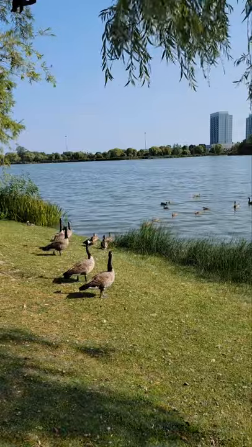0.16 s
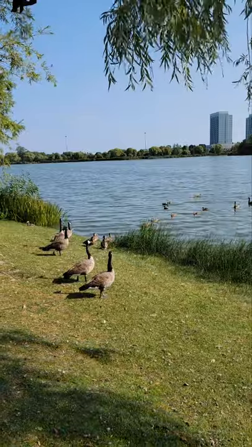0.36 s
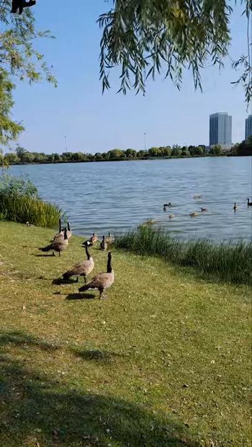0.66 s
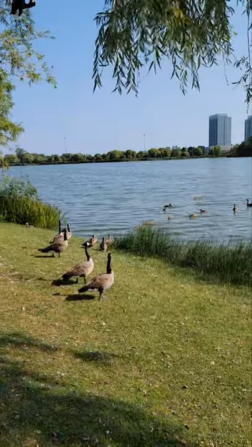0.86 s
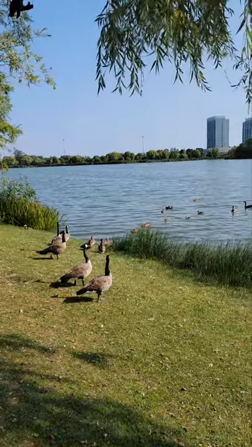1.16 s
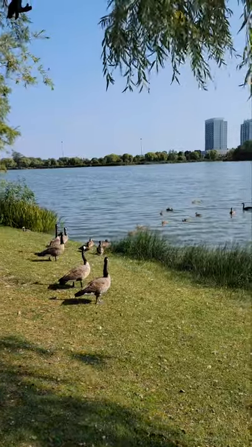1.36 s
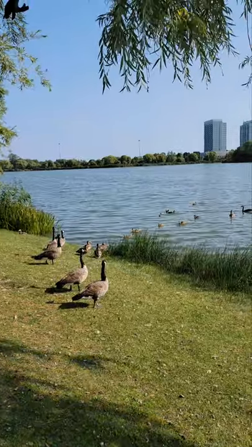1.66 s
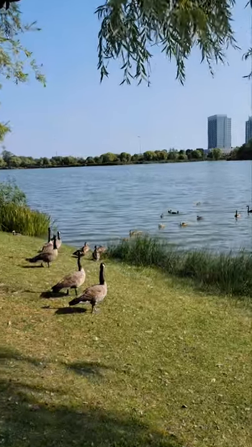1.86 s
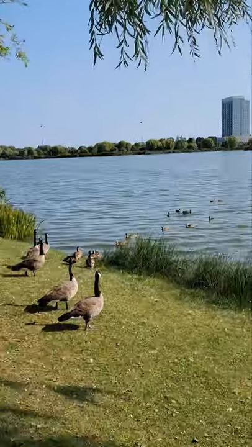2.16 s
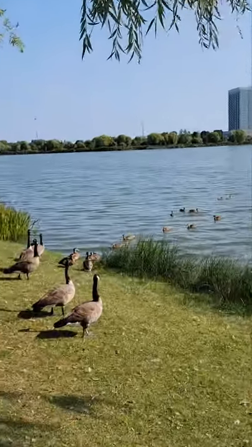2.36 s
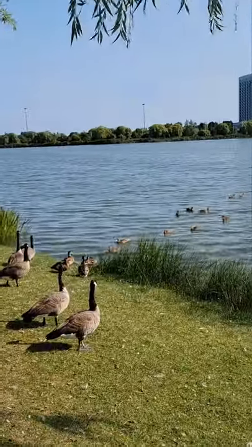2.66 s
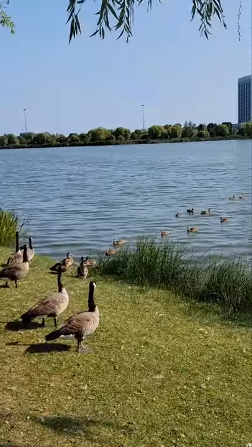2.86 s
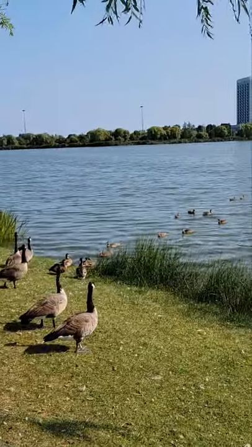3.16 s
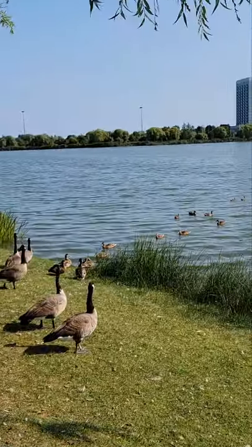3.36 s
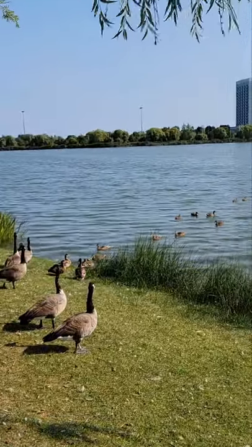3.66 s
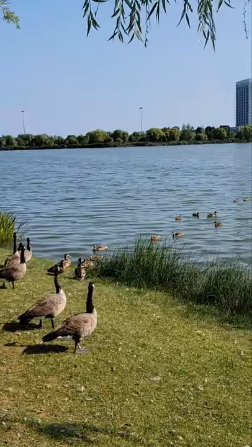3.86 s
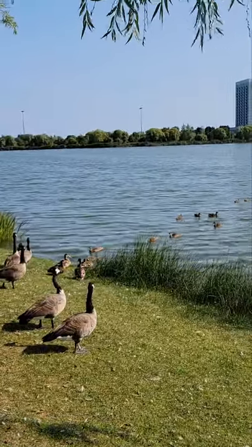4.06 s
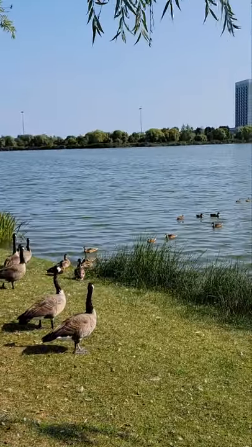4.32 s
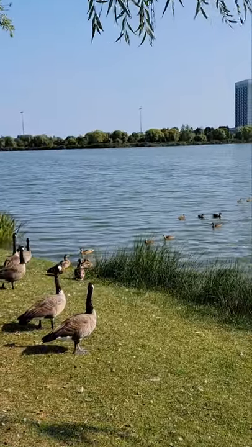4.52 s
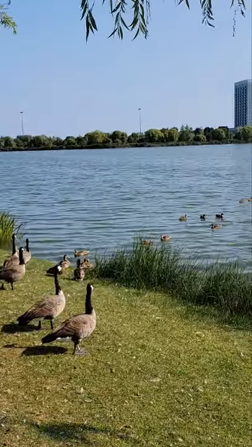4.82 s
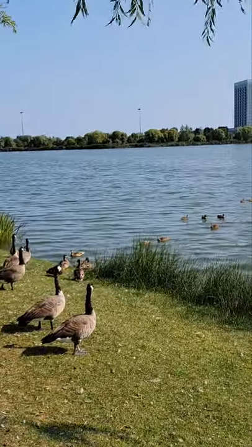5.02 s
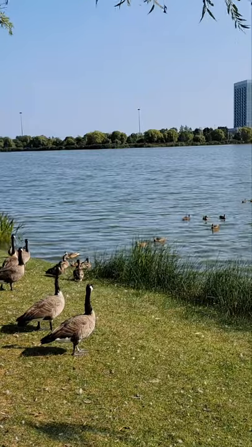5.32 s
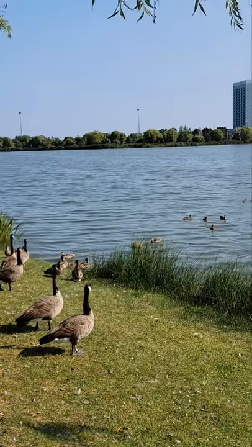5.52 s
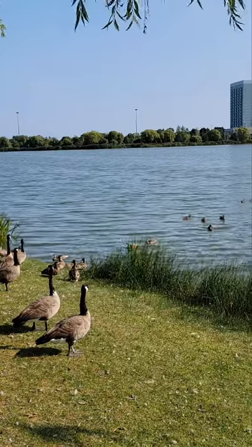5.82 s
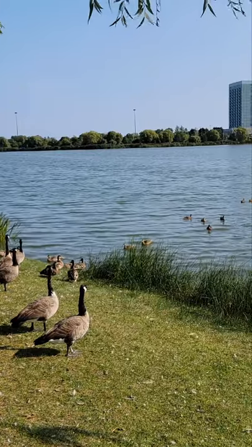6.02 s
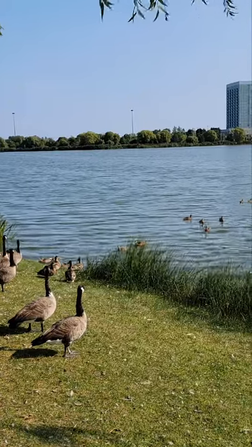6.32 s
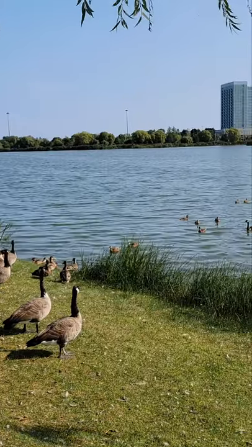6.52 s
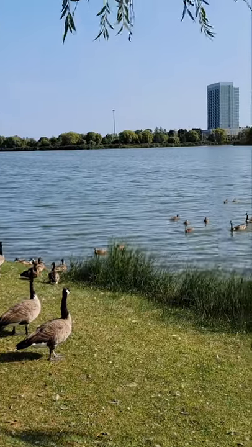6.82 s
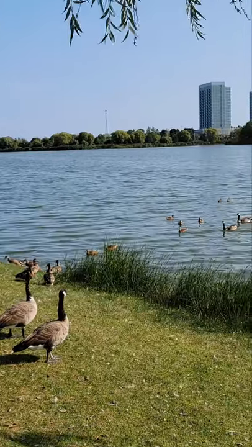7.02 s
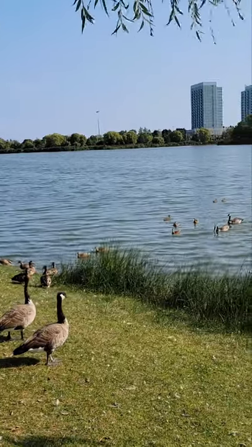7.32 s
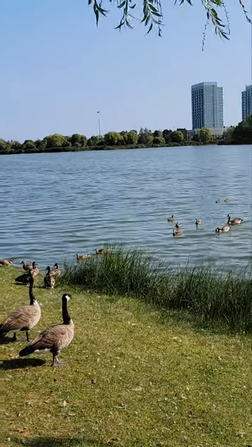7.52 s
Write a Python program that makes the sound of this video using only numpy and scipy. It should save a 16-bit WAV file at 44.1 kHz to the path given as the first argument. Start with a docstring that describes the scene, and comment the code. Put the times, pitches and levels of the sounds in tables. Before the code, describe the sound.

Outdoors on a grassy lake bank, heard through a handheld stereo phone. Steady low wind rumble flutters and gusts, over a soft distant town wash and a thin, high, dry cicada buzz; one nearer buzzer fades after 3 s while another grows further off. A faint far bird call opens the scene. A nearby goose creaks in quickening slow pulses, breaking into a brief nasal honk at 0.95 s; another comes at 1.7 s. A short low grunt follows at 2.3 s. At 3.1 s a honk is chased at once by a lower, hoarser one at 3.23 s, then a gruff grunt at 3.45 s with faint distant bird calls. Afterwards the geese are quiet. Wind thumps at 3.5, 3.8, 4.55 and strongly at 6.4 s, mostly left. Tiny distant calls come at 5.6 and 6.7 s; grass crackles barely audibly around 6.1-6.4 s. Gusts continue until 7.7 s.

```python
"""Geese on the grassy bank of a lake give short honks and two low grunts: harmonic stacks and pulsed resonances.
Creaks of slow pulses lead most honks into a clear tone. Other water birds call far out in swelling sines.
Cicadas buzz in the trees as clicks through random paths, over a noise chorus; grass crackles underfoot.
A town hums across the water as shaped noise; wind noise rumbles on the two ports of a hand-held phone."""
import sys
import numpy as np
from scipy import signal
from scipy.fft import rfft, irfft, next_fast_len
from scipy.io import wavfile
from scipy.ndimage import map_coordinates

SR = 44100
rng = np.random.default_rng(int(sys.argv[2]) if len(sys.argv) > 2 else 0)


def generate_wav(signal):
    """Clip the signal to [-1, 1] and save it as 16-bit WAV at the path in sys.argv[1]."""
    frames = np.transpose(np.atleast_2d(signal))
    scaled = np.clip(frames, -1, 1) * 32767
    pcm = np.round(scaled).astype(np.int16)
    wavfile.write(sys.argv[1], SR, pcm)


N = 338667
T = np.arange(N) / SR

# Levels are relative: source gains, spectra and panning act on top of them.
# honks, one list each: (time [s], fundamental [Hz], level of harmonic 2 [dB])
HONK_TRACKS = [
    [(.939, 654, -38), (.95, 672, -25), (.962, 690, -22), (1.0, 689.7, -22), (1.02, 688, -24.5),
     (1.031, 663, -25), (1.041, 637, -29), (1.057, 595, -43)],
    [(1.722, 650, -29), (1.73, 657, -19), (1.74, 685, -17), (1.752, 706, -22), (1.768, 706, -25.5),
     (1.79, 698, -30), (1.802, 662, -29), (1.811, 616, -35), (1.825, 582, -47)],
    [(2.321, 487, -51), (2.331, 505, -40), (2.348, 516, -53)],
    [(3.121, 640, -40), (3.129, 674, -29), (3.14, 693, -24), (3.153, 699, -23), (3.168, 697, -25),
     (3.19, 672, -29), (3.206, 644, -43)],
    [(3.233, 535, -41), (3.243, 510, -28), (3.257, 512, -29), (3.275, 525, -30), (3.297, 540, -38),
     (3.307, 524, -39), (3.319, 510, -45)],
]
# voice of each honk: (flutter decay [s], overtone hoarseness [rad], levels of harmonics 1-8 [dB])
HONK_VOICES = [(0.016, 0.22, [-31, 0, -49, -42, -47, -31, -44, -42]),
               (0.0042, .2, [-32, 0, -42, -33, -35.5, -32, -40, -41]),
               (.004, .4, [3, 0, 3, -18, -23, -22, -22, -16]),
               (0.022, 0.65, [-25, 0, -36, -35, -43, -34, -47, -50]),
               (0.0051, 0.58, [-23.5, 0, -19, -30.5, -41, -34, -44, -34])]
# creaks, most leading into a call: (time of surge peak [s], build-up [s], level [dB])
CREAK_EVENTS = [(.943, .18, -30.5), (1.721, .14, -33), (3.124, .1, -31.5), (3.232, .045, -33.5),
                (3.449, 0.011, -36.5), (3.506, .012, -48)]
# resonances of the creak: (centre [Hz], width [Hz], level [dB])
CREAK_RESONANCES = [(610, 170, -16), (1028, 62, 0), (1216, 66, 5.5), (1350, 52, 6), (2700, 1100, -27),
                    (3940, 710, -36)]
# grunts: (start [s], length [s], top pulse rate [Hz], level [dB], effort peak [share of length], droop [share])
GRUNT_EVENTS = [(2.321, 0.09, 174.7, -33.5, 0.39, 0.125), (3.436, 0.077, 157.5, -33.5, .3, 0.114)]
# resonances of each grunt, bill nearly shut: (centre [Hz], width [Hz], level [dB])
GRUNT_RESONANCES = [
    [(700, 95, -1.5), (1236, 80, 6.5), (1510, 90, -19), (1920, 120, -14), (3830, 1000, -20),
     (5200, 260, -12)],
    [(470, 45, -7), (600, 66, -2), (1097, 42, 0), (1235, 40, 6), (1730, 45, -12), (3670, 150, -17.5),
     (4130, 230, -16.5)],
]
# calls of other water birds further out: (middle [s], length [s], pitch [Hz], level [dB], pitch spread [share])
FAR_CALL_EVENTS = [(0.021, 0.14, 1540, -50, 0.085), (3.54, 0.083, 2550, -63, 0.044),
                   (3.558, 0.058, 2010, -56.5, 0.01), (5.647, 0.21, 1267, -55.5, 0.0937),
                   (6.725, 0.17, 1780, -60, 0.0115)]
# one cicada in the willow overhead: (time [s], click rate [Hz], level [dB])
NEAR_CICADA_TRACK = [(0, 208, -41), (1, 206.5, -40), (1.6, 206, -42), (2.25, 206.1, -42), (2.6, 204, -44),
                     (3, 202.2, -46.5), (3.6, 209.6, -60), (4.5, 199, -62)]
# its spectrum: (frequency [Hz], level [dB])
NEAR_CICADA_SPECTRUM = [(3800, -57), (4600, -24), (5200, -22), (5700, -6.5), (6600, -5.5), (7900, -3),
                        (9000, -9.5), (9900, -9.5), (11000, -21), (12400, -13), (14000, -22.5),
                        (16000, -23)]
# another cicada further along the bank: (time [s], click rate [Hz], level [dB])
FAR_CICADA_TRACK = [(2.6, 202.3, -51), (3.5, 200.2, -49.5), (4.3, 202, -48.5), (4.8, 204.9, -45.5),
                    (5.8, 205, -46.5), (6.5, 204.4, -46.5), (7.2, 204.2, -46.5), (7.68, 201.5, -46)]
# its spectrum: (frequency [Hz], level [dB])
FAR_CICADA_SPECTRUM = [(4000, -63), (5100, -15), (5330, -6.5), (5800, -12.5), (6800, -7), (7600, -1),
                       (8300, -10.5), (9400, -9), (10300, -24), (11200, -35), (12300, -22.5), (14000, -39),
                       (16000, -30)]
# blurred chorus of the other cicadas: (time [s], level [dB])
CHORUS_TRACK = [(0, -50), (2, -48.5), (2.8, -46), (4, -45.5), (5, -47.5), (7.68, -51.5)]
# its spectrum: (frequency [Hz], level [dB])
CHORUS_SPECTRUM = [(4000, -21), (4800, -18), (5500, -6.5), (6500, -1.5), (7400, -2.5), (8500, -7),
                   (10000, -21.5), (11200, -20), (12400, -24), (14000, -22), (16000, -27)]
# steps in the grass: (middle [s], length [s], level [dB])
STEP_EVENTS = [(6.14, 0.49, -61.5), (6.37, 0.079, -58.5)]
# town and lapping water: (time [s], level [dB])
TOWN_TRACK = [(0, -44), (.5, -45.5), (1.2, -45.5), (2.6, -48), (3.4, -46), (4.5, -48), (5.3, -47),
              (6.2, -46), (7, -46.5), (7.68, -47)]
# their spectrum: (frequency [Hz], level [dB])
TOWN_SPECTRUM = [(30, -22), (70, -5.5), (150, -0.5), (250, -0.5), (400, -8.5), (600, -14.5), (950, -11),
                 (1400, -15.5), (2000, -25.5), (3000, -29.5), (4500, -36.5), (16000, -31.5)]
# breeze on the ports: (time [s], level [dB], left minus right [dB])
BREEZE_TRACK = [(0, -39.5, -2), (.5, -38, -1), (.65, -42, 0), (1.1, -39, -2.5), (1.65, -36.5, 1.5),
                (1.9, -41, -2), (2.6, -43.5, -1), (2.9, -37, 1), (3.2, -40.5, -4), (3.32, -32, -12),
                (3.78, -32, -7), (3.92, -37.5, -4), (4.25, -41.5, -1), (4.5, -36.5, -3.5),
                (5.3, -39.5, -1.5), (5.9, -39.5, -0.5), (6.8, -36, 2.5), (7.68, -43, 0)]
# short gusts on top of it: (middle [s], length [s], level [dB], left minus right [dB])
GUST_EVENTS = [(0.119, 0.046, -30.5, 16), (0.225, 0.098, -37, 3), (1.098, 0.14, -35.5, -15),
               (1.583, 0.25, -36.5, -2), (4.002, 0.082, -32.5, 14), (4.113, .1, -32, -7),
               (4.87, 0.12, -35, -12), (5.602, 0.16, -35.5, -5), (6.088, 0.07, -36, 11),
               (7.177, 0.23, -32, 6), (7.379, 0.068, -33.5, 6)]
# spectrum of breeze and gusts: (frequency [Hz], level [dB])
WIND_SPECTRUM = [(15, -50), (28, -20), (42, -3), (62, -0.5), (88, -3.5), (115, -11), (160, -24),
                 (300, -39.5), (800, -69)]
# single eddies that thump a port: (time [s], peak [dB], ring [Hz], left minus right [dB])
BUFFET_EVENTS = [(3.462, -23, 70, -17), (3.81, -16.5, 68.6, -10), (4.551, -20, 81, -16),
                 (6.424, -15, 80.4, 20)]

BREAK_S, BREAK_HOARSE_RAD = 0.0066, 0.62  # extra overtone hoarseness, decaying after the break into tone
EDGE_S, OVERTONE_RELEASE_S = 0.0056, 0.04
OVERTONE_SHARE = 0.4  # overtones follow this share of the level swings in dB
CREAK_SWELL_DB_PER_S, CREAK_SURGE_DB, CREAK_SURGE_S, CREAK_END_S = 72, 11, 0.035, 0.025
CREAK_SLOW_HZ, CREAK_FAST_HZ, CREAK_QUICKEN_S = 139.9, 177.4, .045
GRUNT_SCOOP = .06  # a grunt's pulse rate starts lower by this share
TOP_HZ = 15750


def geese(gain_db=2.5, shade=0.69, shade_hz=1300, facing=0.65, facing_hz=4000, scatter_db=-29):
    """Sum of creaks, honks and grunts, shaded by the phone and scattered by the bank."""
    creaks = sum(creak(*row) for row in CREAK_EVENTS)
    honks = sum(honk(rows, *voice) for rows, voice in zip(HONK_TRACKS, HONK_VOICES))
    grunts = sum(grunt(*row, modes) for row, modes in zip(GRUNT_EVENTS, GRUNT_RESONANCES))
    voice = undb(gain_db) * (creaks + honks + grunts)
    # the phone's body shades the left port in one band; the treble favours it, as it faces the geese
    treble = facing / 2 * signal.lfilter(*signal.iirpeak(facing_hz, 1, SR), voice)
    shaded = shade * signal.lfilter(*signal.iirpeak(shade_hz, 1.3, SR), voice)
    ports = np.array([voice - shaded + treble, voice - treble])
    return ports + bank_scatter(voice, scatter_db, t60_s=0.47)


def honk(rows, flutter_s, hoarse_rad, harmonics_db, waver=.002, patchy_db=3, flutter_hz=180, flutter_db=-3):
    """The syrinx sings a harmonic stack on a moving pitch; the throat mostly favours harmonic 2."""
    start_s, length_s = rows[0][0], max(rows[-1][0] - rows[0][0], .01)
    i, age = stretch(start_s, length_s)
    hz, db = curves(rows, start_s + age)
    phase = 2 * np.pi * np.cumsum(hz * (1 + waver * walk(430, len(i)))) / SR
    # the creak's slow flapping lingers: side tones under the main one
    flutter = undb(flutter_db) * np.exp(-(age / flutter_s) ** 2 - 2j * np.pi * flutter_hz * age)
    tone = undb(db) * np.imag(np.exp(2j * phase) * (1 + flutter + flutter ** 2))

    overtone_db = db.max() + OVERTONE_SHARE * (db - db.max())
    overtone_gain = undb(overtone_db) * ramp((length_s - age) / OVERTONE_RELEASE_S) ** 4
    spread_rad = hoarse_rad + BREAK_HOARSE_RAD * np.exp(-age / BREAK_S)
    for k, level_db in enumerate(harmonics_db, 1):
        if k != 2:
            blur = spread_rad * min(k / 4, 1) * walk(350, len(i))
            gain = overtone_gain * undb(level_db + patchy_db * walk(78, len(i)))
            tone += gain * np.sin(k * phase + blur)
    out = np.zeros(N)
    out[i] = np.sqrt(2) * tone * ramp(age / EDGE_S) * ramp((length_s - age) / EDGE_S)
    return out


def creak(peak_s, length_s, db, fade_in_s=0.0093):
    """Pressure builds: pulses grow louder and faster up to the surge peak, then die quickly."""
    i, age = stretch(peak_s - length_s, length_s + CREAK_END_S)
    lead = np.maximum(length_s - age, 0)
    hz = CREAK_SLOW_HZ + (CREAK_FAST_HZ - CREAK_SLOW_HZ) * np.exp(-lead / CREAK_QUICKEN_S)
    surge_db = CREAK_SURGE_DB * (np.exp(-lead / CREAK_SURGE_S) - 1)
    effort = undb(surge_db - CREAK_SWELL_DB_PER_S * lead)
    effort *= ramp(age / fade_in_s) * ramp((age[-1] - age) / CREAK_END_S) ** 2
    out = np.zeros(N)
    out[i] = undb(db) * rattle(hz, effort, CREAK_RESONANCES, jitter=.01, scatter_db=1.8, air_db=-9)
    return out


def grunt(start_s, length_s, rate_hz, db, peak, droop, modes, fullness=0.84, throat_share=0.78):
    """One arch of effort without clear tone; pulse rate and, less so, throat resonances rise and sag."""
    i, age = stretch(start_s, length_s)
    u = age / length_s
    scoop = GRUNT_SCOOP * (1 - u / peak) ** 2
    sag = droop * ((u - peak) / (1 - peak)) ** 2
    bend = 1 - np.where(u < peak, scoop, sag)
    throat = bend ** throat_share
    effort = np.sin(np.pi * np.interp(u, [0, peak, 1], [0, .5, 1])) ** fullness
    voice = rattle(rate_hz * bend / throat, effort, modes, jitter=.01, scatter_db=2, air_db=-11)
    out = np.zeros(N)
    out[i] = undb(db) * map_coordinates(voice, [np.cumsum(throat)])  # read speed shifts the resonances
    return out


def rattle(hz, effort, modes, jitter, scatter_db, air_db, brightening=0.3):
    """Slack membranes slap in slow pulses that ring the low resonances; rushing air stirs the high ones."""
    n = len(hz)
    hz = hz * (1 + .012 * walk(90, n))
    slaps = unit(pulses(hz, jitter, scatter_db))
    air = rng.standard_normal(n)
    voice = ring(unit(slaps + undb(air_db) * air), modes)
    rush = ring(unit(slaps + air), modes)
    low = signal.sosfiltfilt(signal.butter(4, 2200, fs=SR, output="sos"), voice)
    high = signal.sosfiltfilt(signal.butter(4, 2200, "high", fs=SR, output="sos"), rush)
    # the rush gains on the slaps as effort rises
    return (low + high * effort ** brightening) * effort / np.std(voice)


def bank_scatter(x, echo_db, t60_s=0.72):
    """Dull scatter from trees and reeds: convolution with decaying noise."""
    t = T[:SR]
    tail = rng.standard_normal((2, SR)) * undb(-60 * t / t60_s) * np.minimum(t / 0.029, 1)
    tail = signal.lfilter(*signal.butter(1, 3500, fs=SR), tail)
    tail /= np.sqrt(np.sum(tail ** 2, axis=1, keepdims=True))
    return undb(echo_db) * signal.fftconvolve(x[None], tail, axes=1)[:, :N]


def cicadas():
    """Two single buzzers in front of a noise chorus."""
    near = cicada(NEAR_CICADA_TRACK, NEAR_CICADA_SPECTRUM, waver=0.00166, likeness=0.054)
    far = cicada(FAR_CICADA_TRACK, FAR_CICADA_SPECTRUM, waver=0.001716, likeness=0.006)
    chorus_gain = undb(curves(CHORUS_TRACK)[0] + 1.84 * walk(6.6))
    chorus = colour(stereo_noise(likeness=-0.15), CHORUS_SPECTRUM) * chorus_gain
    return near * pan(2.5) + far * pan(3.0) + chorus * pan(0.5)


def cicada(rows, spectrum, waver, likeness, path_count=4):
    """Tymbal clicks ring the body; paths through swaying leaves make each harmonic fade on its own."""
    hz, db = curves(rows)
    clicks = pulses(hz * (1 + waver * walk(60)), jitter=.001, scatter_db=.8)
    shares = np.array([walk(0.815) for _ in range(path_count)])
    shares /= np.sqrt(np.sum(shares ** 2, axis=0))
    buzz = 0
    for share in shares:
        leaves = stereo_noise(likeness, SR // 35)
        buzz = buzz + share * signal.oaconvolve(clicks[None], leaves, axes=1)[:, :N]
    return colour(buzz, spectrum) * undb(db)


def far_birds():
    """Short swelling sines, some pure and some hoarse by pitch wander, blurred by the distance."""
    out = np.zeros(N)
    for middle_s, length_s, hz, db, hoarse in FAR_CALL_EVENTS:
        pitch_hz = hz * (1 + hoarse * walk(600))
        tone = np.sin(2 * np.pi * np.cumsum(pitch_hz) / SR)
        out += undb(db) * np.sqrt(2) * swell(middle_s, length_s) * tone
    return out + bank_scatter(out, echo_db=-9.5)


def wind(gain_db=2.5, flutter_db=1.0, port_flutter_db=0.6, eddy_s=0.0067):
    """Turbulence rumbles on each port, fluttering and gusting; single eddies thump as decaying rings."""
    db, pan_db = curves(BREEZE_TRACK)
    flutter = flutter_db * walk(9) + port_flutter_db * np.array([walk(10) for _ in range(2)])
    power = (undb(db + flutter) * pan(pan_db)) ** 2
    for middle_s, length_s, gust_db, side_db in GUST_EVENTS:
        power = power + (undb(gust_db) * swell(middle_s, length_s) * pan(side_db)) ** 2
    turbulence = colour(stereo_noise(likeness=.5), WIND_SPECTRUM)
    out = turbulence * np.sqrt(power) * undb(gain_db)
    for peak_s, peak_db, hz, side_db in BUFFET_EVENTS:
        t = T - peak_s
        thump = np.exp(-np.abs(t) / eddy_s) * np.cos(2 * np.pi * hz * t)
        out -= undb(peak_db) * thump * pan(side_db)
    return out


def steps():
    """Grass blades crackle faintly under a shoe: noise with a fast random level."""
    press = sum(undb(db) * swell(middle_s, length_s) for middle_s, length_s, db in STEP_EVENTS)
    blades = stereo_noise(likeness=.3) * undb(2.5 * walk(250))
    return press * colour(blades, [(500, -34), (1500, 0), (3000, 6), (5000, 0), (15000, -33)])


def town(swell_db=0.18):
    """A far-off wash of noise, most alike at the two ports in the bass."""
    wash = stereo_noise(likeness=0.38)
    mid = wash.mean(axis=0)
    wash = mid + signal.lfilter(*signal.butter(1, 350, "high", fs=SR), wash - mid)
    gain = undb(curves(TOWN_TRACK)[0] + swell_db * walk(3.6))
    return colour(wash, TOWN_SPECTRUM) * gain * pan(-2.0)


def undb(db):
    """Decibels to gain."""
    return 10 ** (np.asarray(db) / 20)


def unit(x):
    """Scale to rms 1."""
    return x / np.sqrt(np.mean(x ** 2))


def curves(rows, t=T):
    """Columns of a (time [s], values..) table, joined by straight lines."""
    s, *columns = np.transpose(rows)
    return [np.interp(t, s, c) for c in columns]


def response(points, hz):
    """Gain of a (frequency [Hz], level [dB]) spectrum at the given frequencies."""
    f, db = np.transpose(points)
    return undb(np.interp(np.log(hz + 1), np.log(f), db))


def colour(x, points):
    """Filter by a spectrum; rms 1."""
    size = next_fast_len(N)
    hz = np.arange(size // 2 + 1) * SR / size
    return unit(irfft(rfft(x, size) * response(points, hz), size)[..., :N])


def walk(rate_hz, n=N):
    """Random wander, straight lines between normal draws; spread near 1."""
    u = np.arange(n) * rate_hz / SR
    knots = int(u[-1]) + 2
    return 1.217 * np.interp(u, np.arange(knots), rng.standard_normal(knots))


def pan(db):
    """Left and right gains for a level difference, mean power 1."""
    g = undb(np.array([[1], [-1]]) * db / 2)
    return g / np.sqrt(np.mean(g ** 2, axis=0))


def stereo_noise(likeness, n=N):
    """Two noises with the given correlation."""
    mid, side = rng.standard_normal((2, n))
    return np.sqrt(1 + likeness) * mid + np.sqrt(1 - likeness) * side * np.array([[1], [-1]])


def pulses(hz, jitter, scatter_db):
    """A band-limited click once a cycle, each a little off in time (share of a cycle) and size."""
    phase = np.cumsum(hz) / SR
    at = np.interp(np.arange(.5, phase[-1]), phase, np.arange(len(hz)))
    late, size = rng.standard_normal((len(at), 2)).T
    at = at + jitter * late * SR / np.mean(hz)
    taps = at.astype(int)[:, None] + np.arange(-7, 9)
    d = taps - at[:, None]
    clicks = np.sinc(d) * np.sinc(d / 8) * undb(scatter_db * size)[:, None]  # windowed sinc
    return np.bincount(np.clip(taps, 0, len(hz) - 1).ravel(), clicks.ravel(), len(hz))


def ring(x, modes):
    """Parallel two-pole resonances, each steepened by a second one four times as wide."""
    out = 0
    for hz, width_hz, db in modes:
        peak = signal.iirpeak(hz, hz / width_hz, SR)
        skirt = signal.iirpeak(hz, hz / (4 * width_hz), SR)
        out = out + undb(db) * signal.lfilter(*skirt, signal.lfilter(*peak, x))
    return out


def stretch(start_s, length_s):
    """Sample indices of a call, and the seconds since its start."""
    age = np.arange(int(length_s * SR)) / SR
    return int(start_s * SR) + np.arange(len(age)), age


def ramp(x):
    """Quarter-sine step from 0 to 1."""
    return np.sin(np.pi / 2 * np.clip(x, 0, 1))


def swell(middle_s, length_s):
    """One half-cosine rise and fall."""
    return np.cos(np.pi * np.clip((T - middle_s) / length_s, -.5, .5))


def scene():
    """Everything heard from the bank."""
    return geese() + cicadas() + far_birds() + wind() + steps() + town()


def record(dry):
    """The right port is duller in the top octave; the phone cuts the highest treble."""
    right = signal.sosfilt(signal.butter(2, 12500, fs=SR, output="sos"), dry[1])
    top_cut = signal.ellip(10, .2, 80, TOP_HZ, fs=SR, output="sos")
    return signal.sosfilt(top_cut, np.array([dry[0], right]))


dry = scene()
out = record(dry)
generate_wav(out)
```